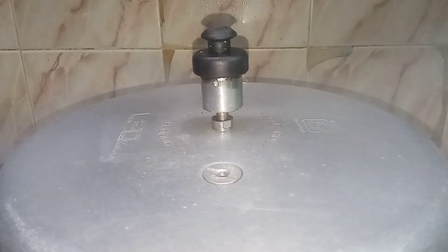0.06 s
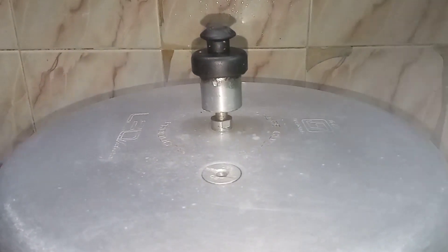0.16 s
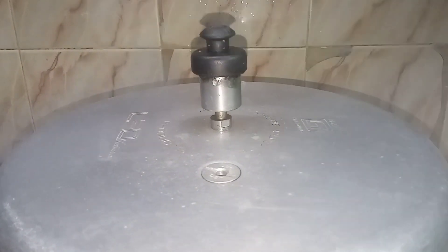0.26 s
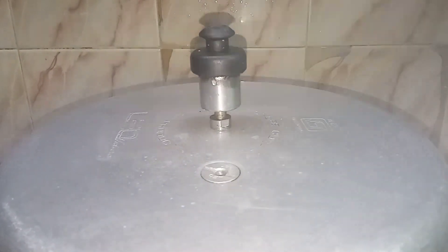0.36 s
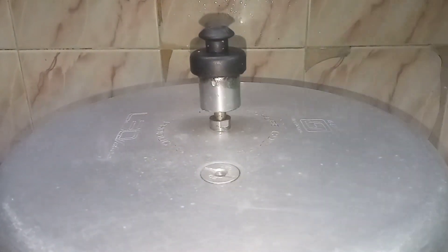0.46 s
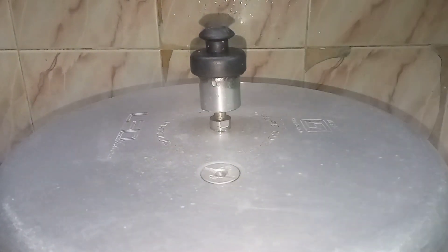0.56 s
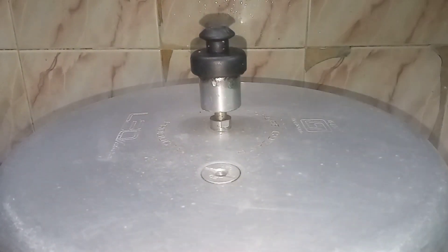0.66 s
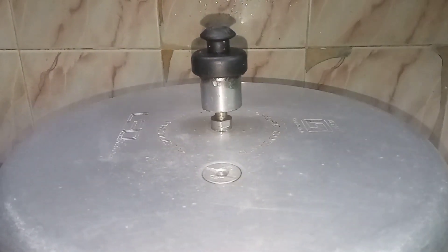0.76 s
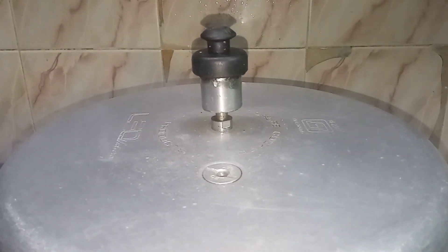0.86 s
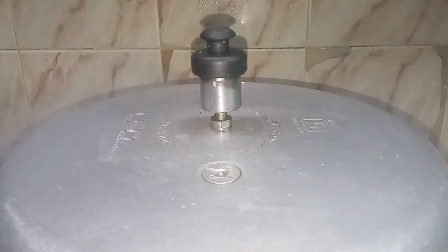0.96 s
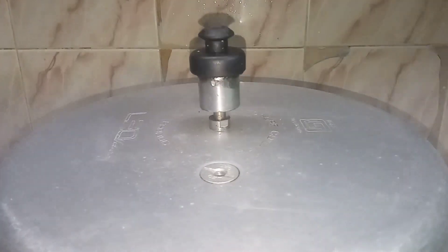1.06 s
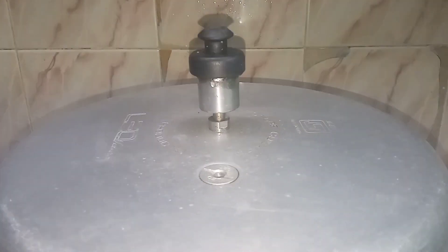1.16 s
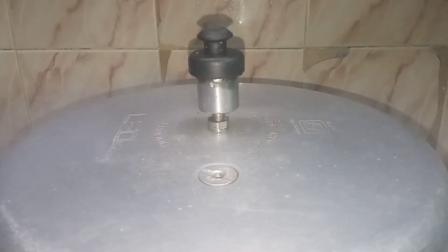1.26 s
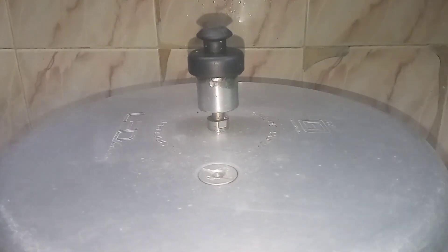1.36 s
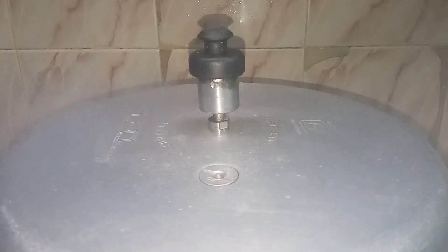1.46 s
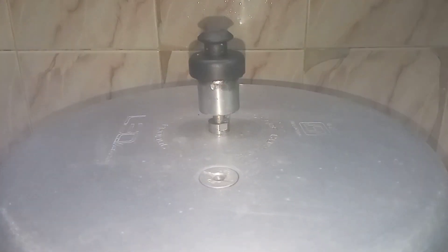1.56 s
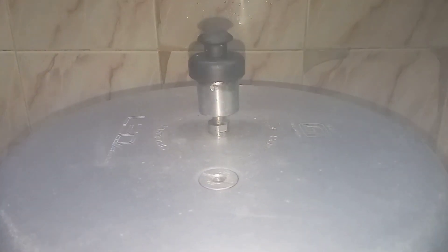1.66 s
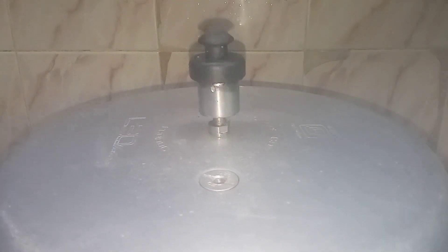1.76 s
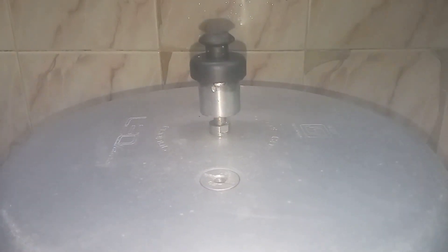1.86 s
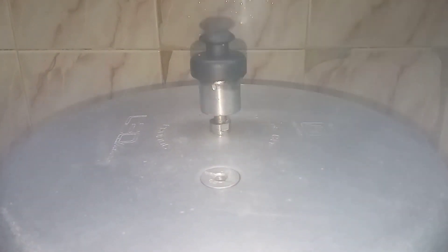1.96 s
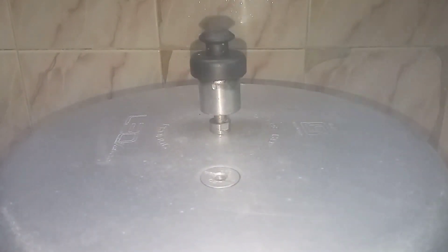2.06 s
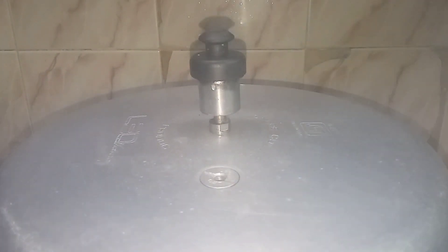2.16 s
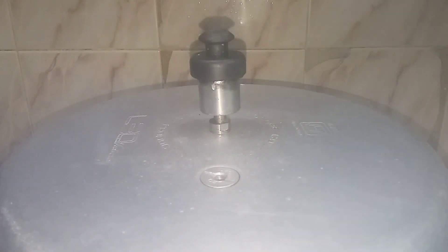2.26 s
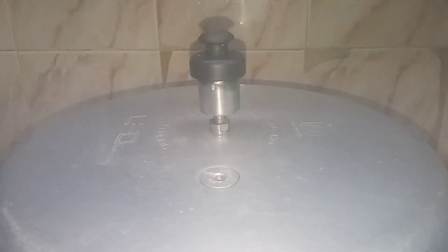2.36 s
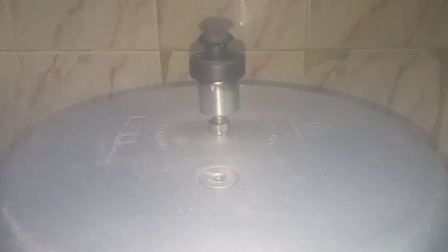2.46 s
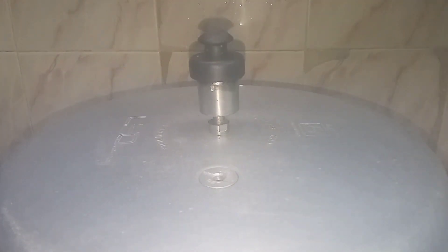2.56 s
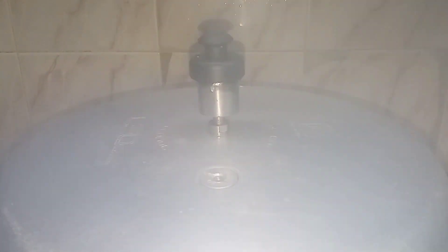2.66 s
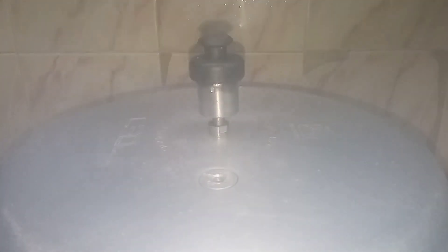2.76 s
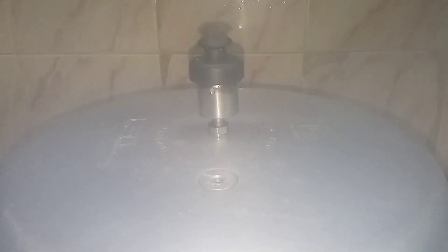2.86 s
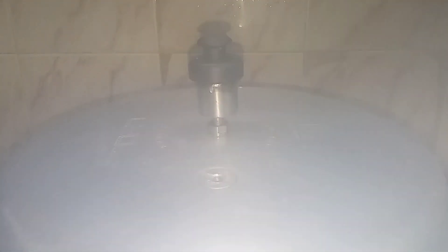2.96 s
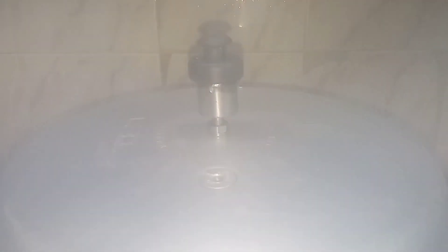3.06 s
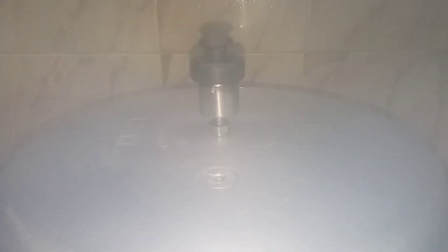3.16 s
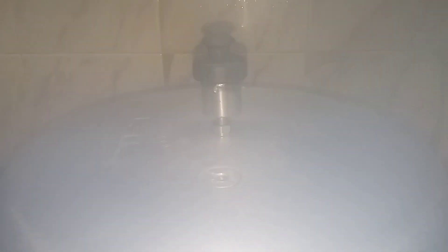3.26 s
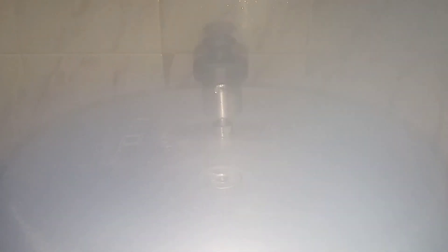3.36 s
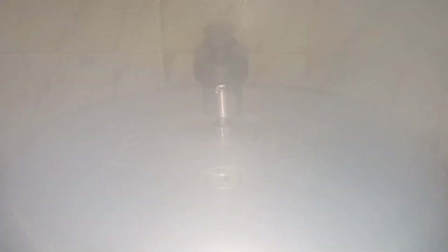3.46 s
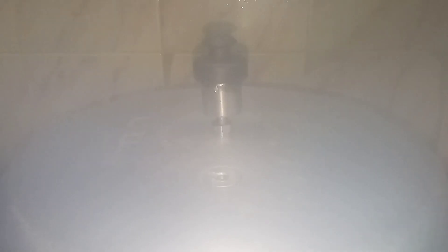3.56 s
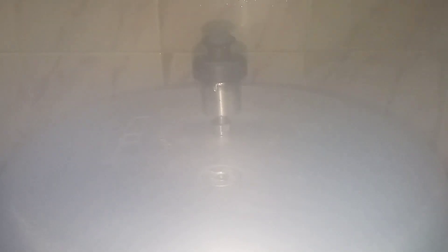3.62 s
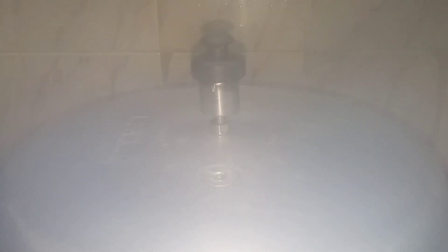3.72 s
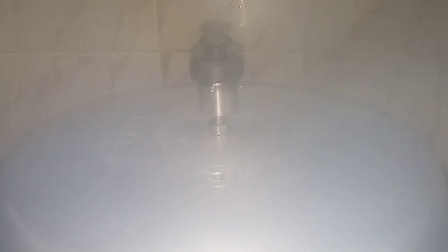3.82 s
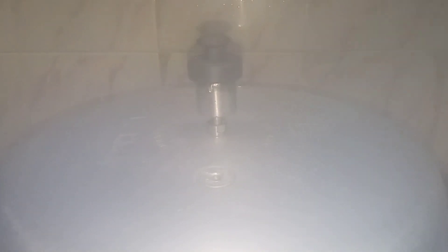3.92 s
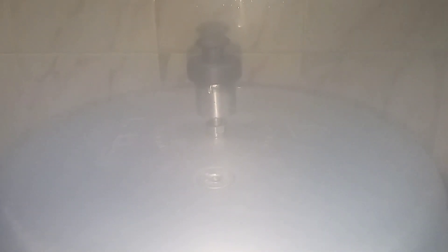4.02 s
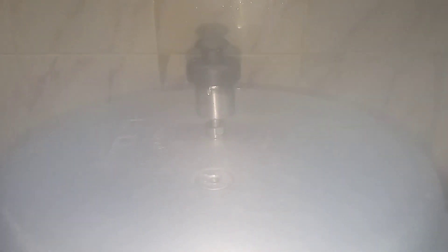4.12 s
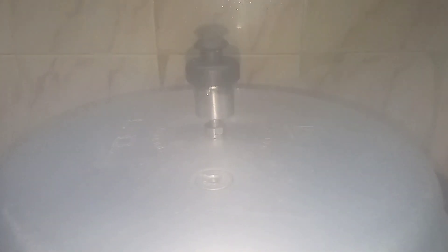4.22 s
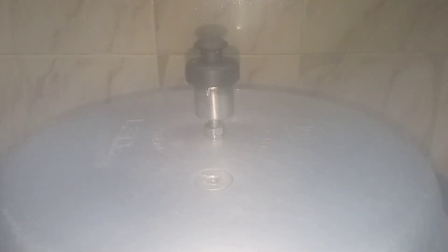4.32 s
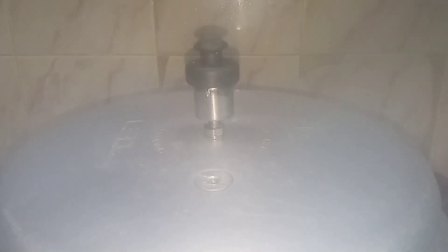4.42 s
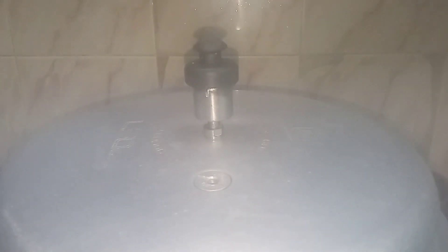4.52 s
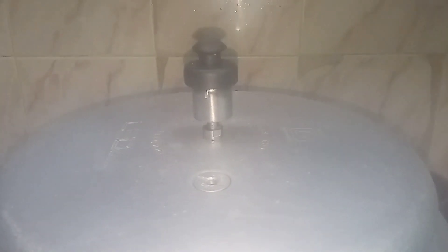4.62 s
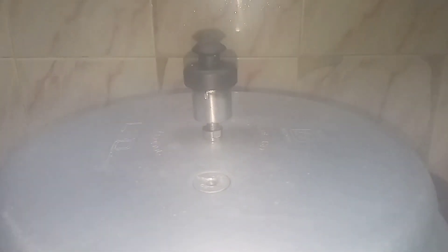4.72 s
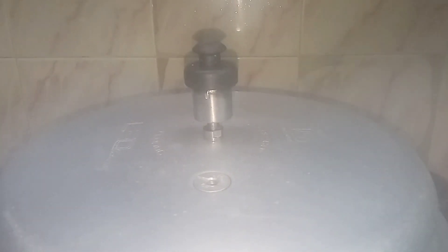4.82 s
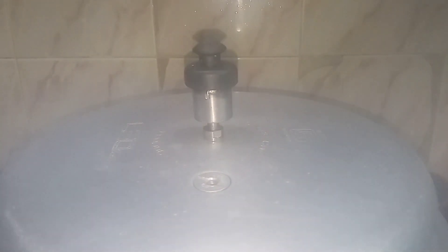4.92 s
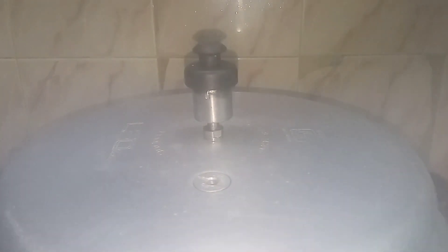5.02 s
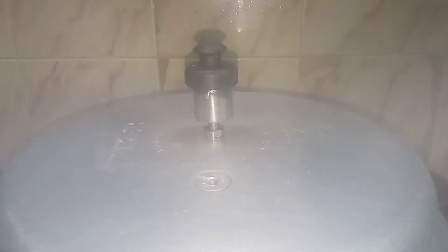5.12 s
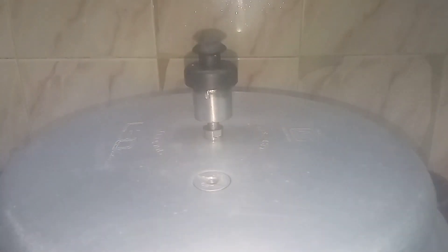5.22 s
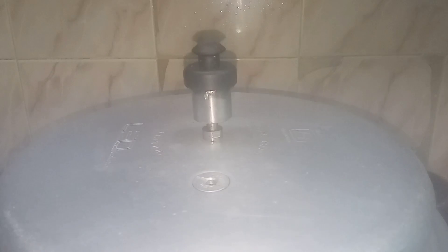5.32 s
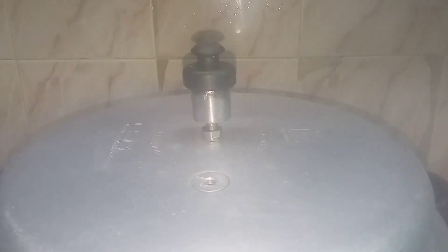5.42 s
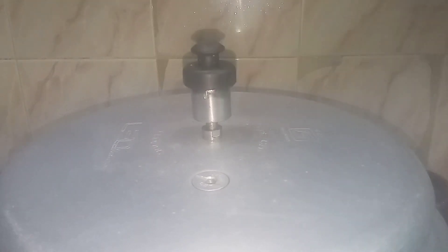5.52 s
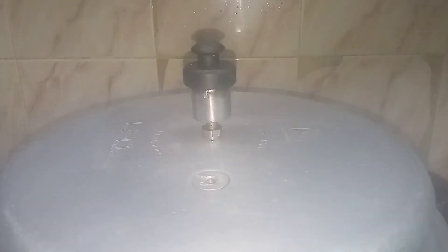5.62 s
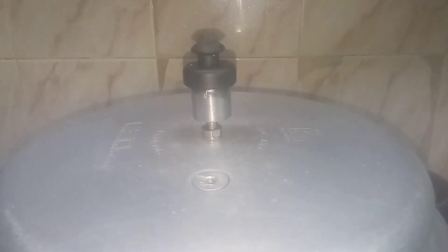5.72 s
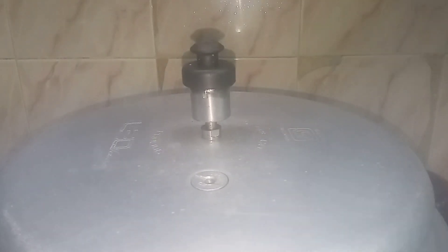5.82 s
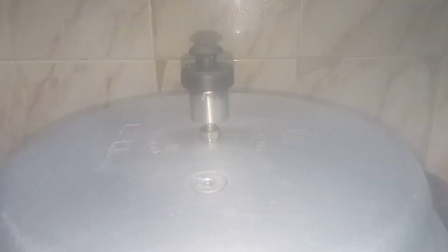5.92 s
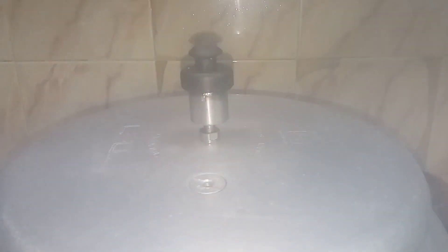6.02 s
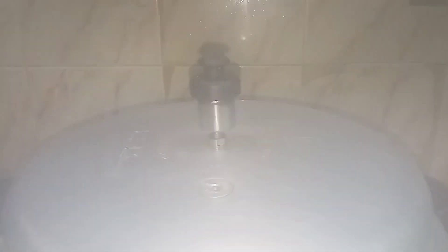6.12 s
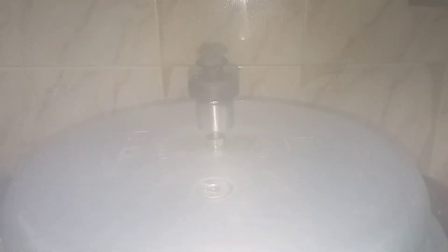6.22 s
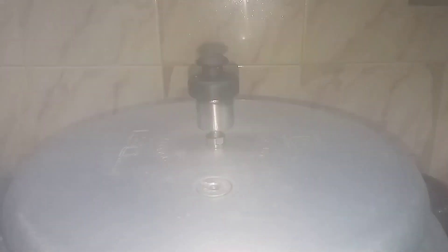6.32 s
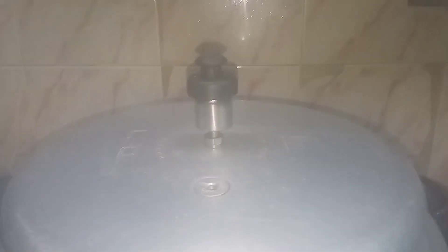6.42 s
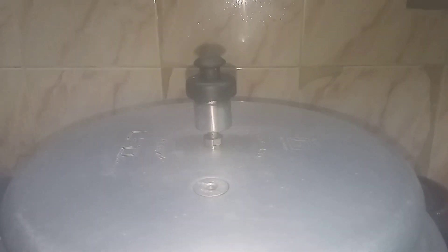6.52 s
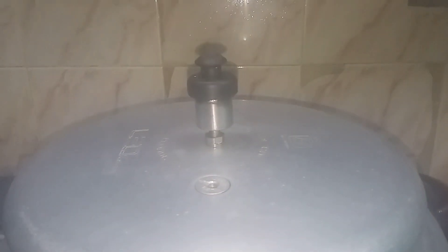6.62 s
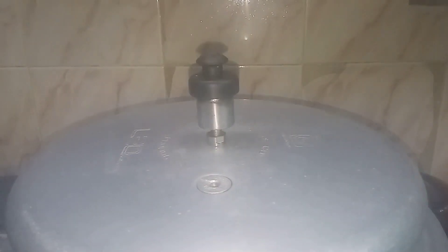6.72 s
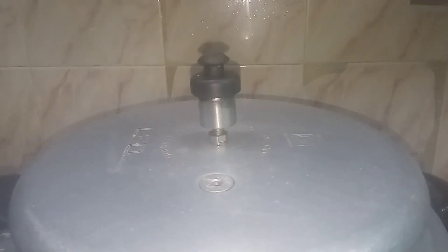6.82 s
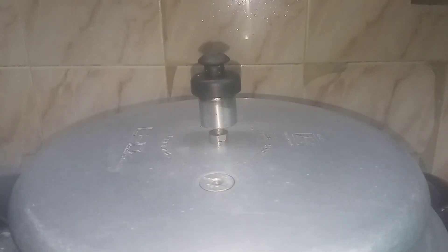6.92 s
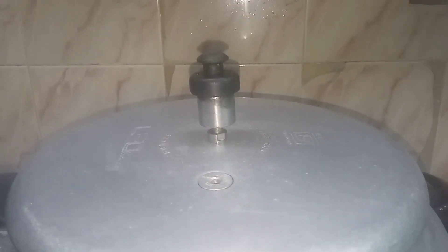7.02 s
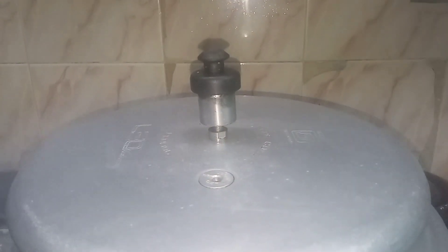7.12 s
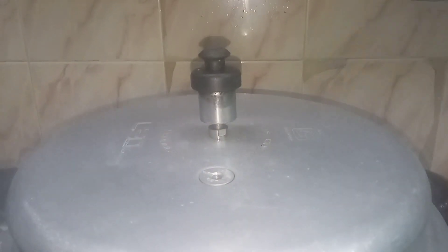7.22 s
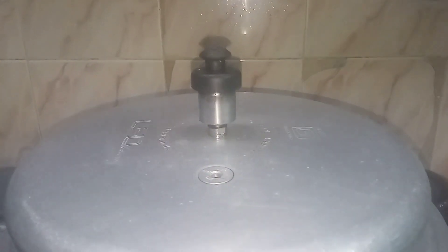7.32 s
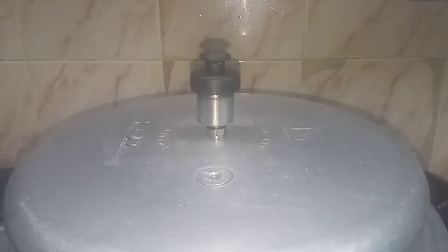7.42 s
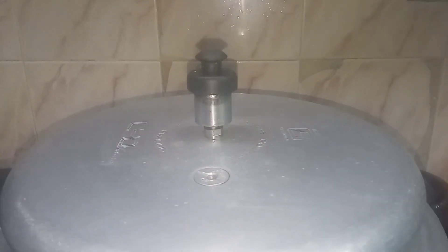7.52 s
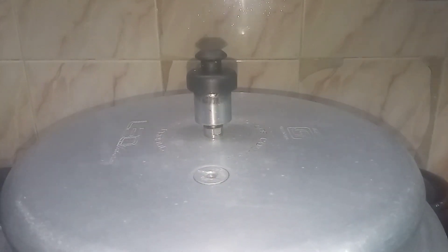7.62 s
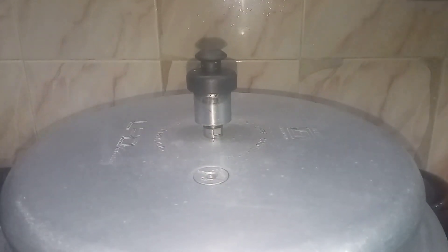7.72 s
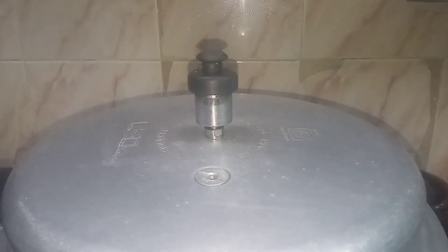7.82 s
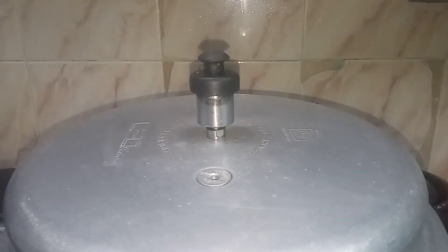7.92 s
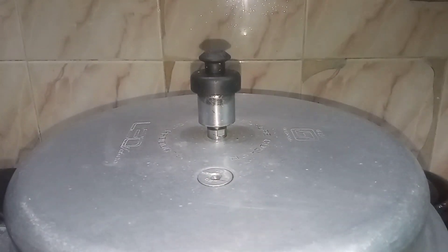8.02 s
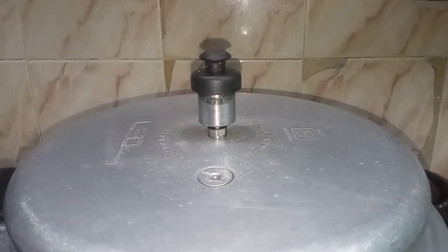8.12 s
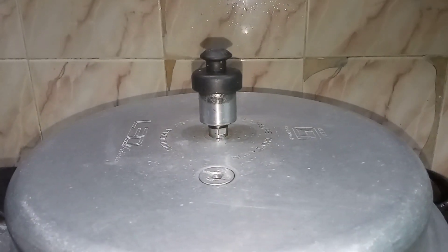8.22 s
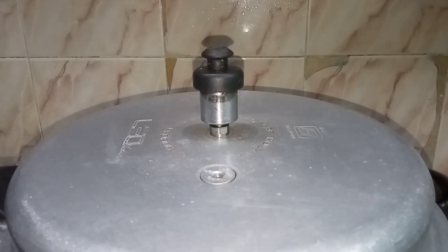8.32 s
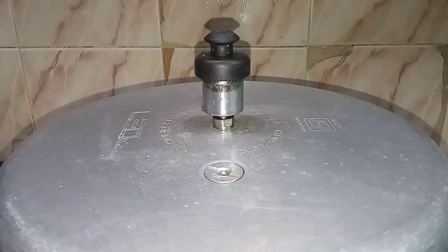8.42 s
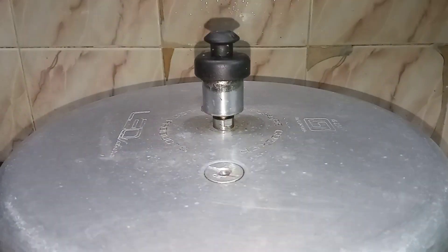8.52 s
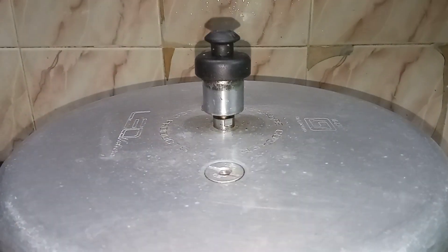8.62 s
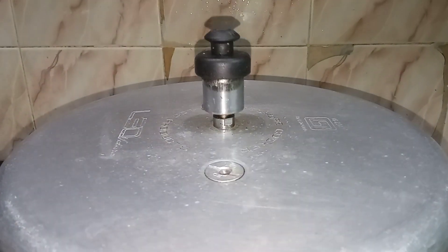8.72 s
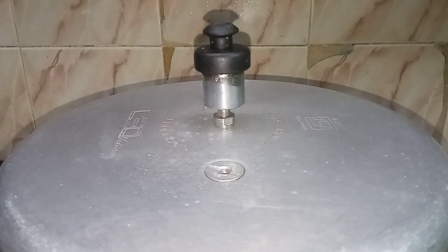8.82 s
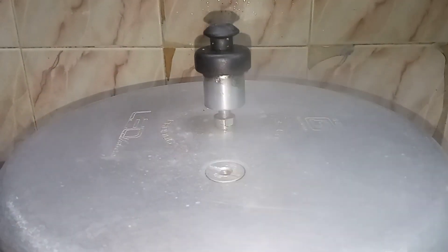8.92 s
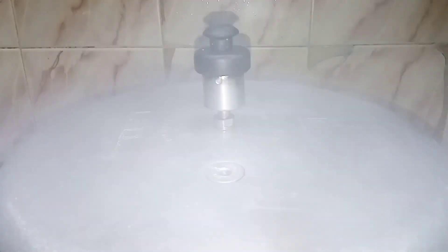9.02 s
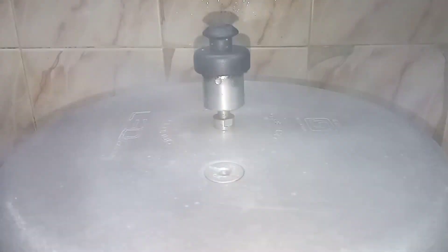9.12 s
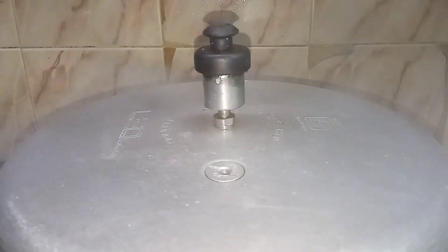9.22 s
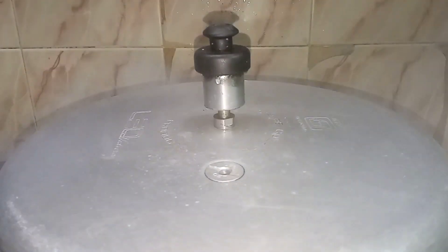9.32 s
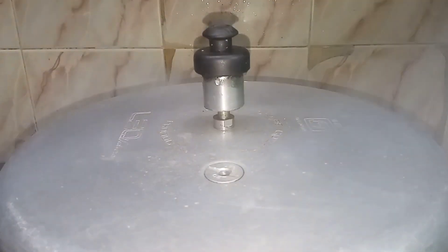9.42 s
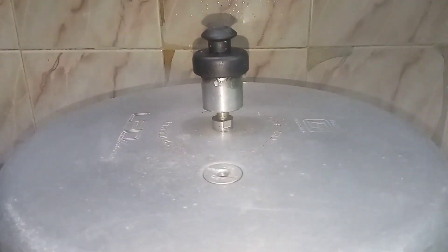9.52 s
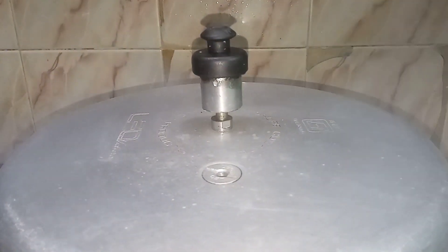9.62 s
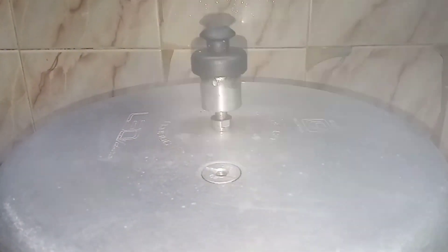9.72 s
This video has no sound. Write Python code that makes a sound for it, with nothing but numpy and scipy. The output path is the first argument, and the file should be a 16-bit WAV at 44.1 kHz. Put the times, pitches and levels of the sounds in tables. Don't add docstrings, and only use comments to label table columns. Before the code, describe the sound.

Loud continuous steam hiss from a pressure cooker weight, dense and slightly fluttering, dominates for over seven seconds. A low, blustery rumble joins it for about a second, then several quick metal knocks on the lid stop the jet. Roughly a second of quiet burner and thin leak follows, with tiny squeaks and an abrupt cut and fade-in, before a light knock releases the hiss again. Close handheld microphone, hard tiled kitchen.

```python
import sys
import numpy as np
from scipy import signal
from scipy.fft import rfft, irfft, next_fast_len
from scipy.io import wavfile
from scipy.ndimage import uniform_filter1d

SR = 44100
rng = np.random.default_rng(int(sys.argv[2]) if len(sys.argv) > 2 else 0)


def generate_wav(sig):
    pcm = np.round(np.clip(np.atleast_2d(sig).T, -1, 1) * 32767).astype(np.int16)
    wavfile.write(sys.argv[1], SR, pcm)


def volts_from_decibels(level):
    exponent = np.asarray(level, float) / 20
    return 10 ** exponent


N = 430857

# frequency in Hz, level in dB per Hz.
BURNER_COLOUR = [(24, -62), (70, -30), (160, -9), (231, -18.5), (327, -6), (490, -14.5), (605, -16.5),
                 (667, -15), (3700, -27.5), (5200, -69), (8800, -120)]
BURNER_DB = -53
# frequency in Hz, level in dB per Hz.
LEAK_COLOUR = [(2350, -36), (4000, -6), (5040, -22), (5780, -9), (6110, -9), (6730, -15), (7320, -21),
               (8290, -31), (9710, -16.5), (11600, -15.5), (13100, -19), (13600, -15), (14400, 0),
               (15400, 0)]
LEAK_DB = -27.5
# frequency in Hz, level in dB per Hz.
BOIL_COLOUR = [(120, -52), (200, -24.5), (264, -5.5), (296, -1), (317, -6.5), (600, -6.5), (780, -41),
               (1320, -120)]
BOIL_DB, BOIL_SWING_DB, BOIL_SWING_HZ = -65, 5.5, 6
HUM_START_S, HUM_EARLY_DB = 1.58, -9
# frequency in Hz, level in dB per Hz.
HANDLING_COLOUR = [(15, -43), (25, -13), (27, -20), (65, -22), (157, 6), (200, 1), (260, -41), (440, -120)]
HAND_DB, HAND_SWING_DB, HAND_SWING_HZ = -78.5, 6, 9
# start in seconds, length in seconds, level in dB.
NUDGES = [
    (3.02, 0.093, -64),
    (4.2, .3, -64),
    (6.3, 0.28, -69),
    (7.53, .14, -52),
    (8.92, .06, -64),
    (9.15, .08, -66),
]
# time in seconds, level in dB.
GUST_FORCE = [(6.575, -56), (6.595, -41), (7.1, -38.5), (7.27, -43), (7.3, -47.5), (7.55, -50.5)]
# frequency in Hz, level in dB per Hz.
GUST_COLOUR = [(15, -48), (25, -27), (68, -3.5), (96, 0.5), (230, -5), (361, -13), (395, -14), (687, -25),
               (900, -34), (1170, -50), (1980, -120)]
# start in seconds, length in seconds, extra level in dB.
PUFFS = [
    (6.68, 0.054, 3),
    (6.99, .11, 5.5),
    (7.17, .05, 6),
    (7.23, .03, 4),
]

# start in seconds, length in seconds, centre in Hz, # width
# in Hz, level in dB.
VENT_BURSTS = [
    (8.355, .045, 7750, 120, -83),
    (8.38, .09, 6950, 200, -75),
    (8.36, .1, 6050, 250, -76),
               (7.565, .19, 3450, 1200, -47), (7.57, .14, 2200, 700, -53), (9.13, .09, 1000, 900, -45),
           (9.13, .05, 145, 35, -63), (8.17, .3, 487, 10, -66), (7.97, .12, 327, 20, -66),
           (8.43, .045, 110, 90, -62), (1.205, .04, 550, 500, -53), (1.25, .06, 340, 60, -62)]

# time in seconds, peak in dB, clack frequency in Hz,
# clack T60 in seconds, lid ring in dB relative to the clack.
BLOWS = [
    (7.527, -33, 700, .025, -19),
    (7.543, -15.5, 1190, 0.017, -16),
    (7.572, -19, 1032, 0.023, -13),
    (7.578, -20.5, 1270, .025, -14),
    (7.591, -23, 583, 0.041, -11.5),
    (7.611, -28.5, 544, .022, -12),
    (7.629, -33, 577, .035, -11),
    (8.442, -32, 320, 0.015, -33),
    (8.944, -34, 650, .018, -31),
    (8.949, -26.5, 1094, .032, -28),
]
# frequency in Hz, level in dB, T60 in seconds.
LID_MODES = [(378, -10.5, 0.13), (466, -9, 0.12), (565.5, -0.5, 0.25), (632, -5.5, .1), (787, -6, 0.079),
             (927, -2.5, 0.052), (1085, -2.5, 0.11), (1270, -3, 0.074), (1416, -4, 0.073),
             (1635, -6.5, 0.13), (1914, -6, 0.1)]
# frequency in Hz, level in dB, T60 in seconds.
WEIGHT_MODES = [(2890, -3, 0.018), (3250, -1, .025), (3540, 0, 0.027), (3900, -4, 0.023),
                (4350, -11, 0.018)]
WEIGHT_DB = 8.5

# frequency in Hz, level in dB per Hz.
JET_COLOUR = [(210, -45.5), (350, -28), (636, -27.5), (920, -15.5), (1300, -15.5), (1830, -12.5),
              (2150, -7), (2540, -7), (2850, -2), (3080, -3), (4560, -8), (6430, -1), (7300, -8.5),
              (9490, -38), (16100, -120)]
# frequency in Hz, level in dB per Hz.
JET_TREBLE = [(7300, -11), (8100, -18), (8900, -16.5), (9600, -10.5), (10400, -14), (10800, -10),
              (11300, -14), (11950, -14), (12200, -18), (12800, -15), (13400, -17), (14000, -13),
              (14600, -1), (15100, .5)]
# resonance in Hz, width in Hz, level in dB.
CAVITIES = [(2710, 57, -9), (3360, 28, 2), (3856, 200, -1), (5760, 110, 3), (6400, 280, 1.5),
            (6630, 73, 2.5)]
CROSSOVERS_HZ = [1700, 2300, 7300, 7800, 13500, 13900, 15500, 15520]
# time in seconds, jet level in dB.
FLOW = [(0.0, -28.5), (0.4, -29), (1.19, -28), (1.23, -29), (3.38, -28.5), (4.03, -29.5), (4.11, -28),
        (4.19, -30.5), (4.3, -27.5), (4.76, -30), (4.82, -28.5), (6.04, -28), (6.77, -28), (7.32, -32.5),
        (7.51, -30), (7.53, -32.5)]
STEADY_DB = -30
# level in dB relative to the body, share of flow changes,
# share of valve loss, extra fall after shutting in dB per second, drop at shutting in dB.
LOW_LAYER = (-16.5, 1.25, -0.3, -40, 1)
UPPER_LAYER = (-6.5, 0.54, 1.15, -12, -3.5)
TOP_LAYER = (0, 0, 1.02, 150, -2.5)
SHUT_S, FALL_DB_PER_S = 7.53, 157
ECHO_DB, ECHO_DB_PER_S = -9, 78.5
CREEP_S, CREEP_DB, CREEP_DB_PER_S = 8.6, -24, 7
LIFT_S, LIFT_DB_PER_S = 8.93, 330

# time in seconds, gain in dB.
FADE = [(8.476, 0), (8.4763, -41), (8.487, -48), (8.495, -26), (8.56, -19), (8.59, -7), (8.62, 1.5)]
CUT_S, FADED_IN_S = FADE[0][0], FADE[-1][0]


def evened(x):
    return x / np.sqrt(np.mean(x ** 2) + 1e-20)


def read(points, hz):
    f, value = np.transpose(points)
    return np.interp(np.log(hz + 1), np.log(f + 1), value)


def patches(frames, bins_wide, frames_long, size):
    field = rng.standard_normal((frames, size)).T
    field = uniform_filter1d(field, max(int(bins_wide), 1), axis=0)
    return evened(uniform_filter1d(field, max(int(frames_long), 1), axis=1))


def noise(gain, size):
    z = rng.standard_normal(gain.shape[::-1] + (2,)) @ [1, 1j]
    return signal.istft(z.T * gain, nperseg=size, noverlap=size - size // 4)[1][:N]


def wash(colour, patchy_db, bins_wide, frames_long):
    size = 1024
    frames, hz = N // (size // 4) + 5, np.fft.rfftfreq(size, 1 / SR)
    field_db = read(colour, hz)[:, None] + patchy_db * patches(frames, bins_wide, frames_long, size=len(hz))
    return evened(noise(volts_from_decibels(field_db), size=size))


def ringing(x, hz, width):
    r = np.exp(-np.pi * width / SR)
    return 2 * signal.lfilter([1 - r], [1, -r * np.exp(2j * np.pi * hz / SR)], x).real


def flicker(hz):
    return evened(signal.lfilter(*signal.butter(2, hz, fs=SR), rng.standard_normal(N)))


def add(mix, s, sound):
    part = mix[round(s * SR):][:len(sound)]
    part += sound[:len(part)]


def burner_and_leak():
    colour = BURNER_COLOUR[:-2] + [(hz, db + LEAK_DB) for hz, db in LEAK_COLOUR[2:]]
    return volts_from_decibels(BURNER_DB) * wash(colour, patchy_db=1.0, bins_wide=14, frames_long=10)


def boiling():
    t = np.arange(N) / SR
    boil_db = BOIL_DB + BOIL_SWING_DB * np.tanh(flicker(BOIL_SWING_HZ))
    rumble = volts_from_decibels(boil_db) * wash(BOIL_COLOUR, patchy_db=3.2, bins_wide=5, frames_long=26)
    hum = evened(ringing(rng.standard_normal(N), hz=269, width=34.5))
    return rumble + volts_from_decibels(boil_db - 4.0 + HUM_EARLY_DB * (t < HUM_START_S)) * hum


def handling():
    grip = volts_from_decibels(HAND_DB + HAND_SWING_DB * np.minimum(flicker(HAND_SWING_HZ), 1))
    for s, length, db in NUDGES:
        add(grip, s, volts_from_decibels(db) * np.hanning(int(length * SR)))
    return grip * wash(HANDLING_COLOUR, patchy_db=1.0, bins_wide=4, frames_long=10)


def kitchen():
    pause = np.interp(np.arange(N) / SR, [7.5, 7.7, 8.85, 8.95], [0, 1, 1, 0])
    return pause * burner_and_leak() + (1 - pause) * (boiling() + handling())


def gust():
    t = np.arange(N) / SR
    blowing = np.interp(t, [6.55, 6.56, 7.5, 7.53], [0, 1, 1, 0])
    force_db = np.interp(t, *np.transpose(GUST_FORCE))
    for s, length, db in PUFFS:
        add(force_db, s, db * np.hanning(int(length * SR)))
    lumps = volts_from_decibels(force_db + 4.3 * np.tanh(flicker(hz=35.6)) - 1.5)
    return blowing * lumps * wash(GUST_COLOUR, patchy_db=2.0, bins_wide=7.2, frames_long=5.3)


def vent():
    out = np.zeros(N)
    for s, length, hz, width, db in VENT_BURSTS:
        air = rng.standard_normal(SR // 2)[:int(length * SR)]
        puff = evened(ringing(ringing(air, hz, width), hz, width))
        decay = volts_from_decibels(-16.0 * np.linspace(-.5, .5, len(air)))
        add(out, s, volts_from_decibels(db) * puff * signal.windows.tukey(len(air), .5) * decay)
    return out


def modes(table, spread_db, t):
    return sum(volts_from_decibels(db + extra_db - 60 * t / t60) * np.sin(2 * np.pi * hz * t)
               for (hz, db, t60), extra_db in zip(table, spread_db))


def weight():
    out, t = np.zeros(N), np.arange(SR // 2) / SR
    spreads = rng.standard_normal((len(BLOWS), len(LID_MODES)))
    for (s, db, hz, t60, ring_db), spread in zip(BLOWS, spreads):
        clack = modes([(hz, 0, max(t60, .005))], [0], t)
        lid = volts_from_decibels(ring_db) * modes(LID_MODES, 3.6 * spread, t)
        tick = volts_from_decibels(ring_db + WEIGHT_DB) * modes(WEIGHT_MODES, 2.0 * spread, t)
        onset = 1 - np.exp(-t / 0.001)
        add(out, s, volts_from_decibels(db) * (clack + lid + tick) * onset)
    tail = rng.standard_normal(len(t)) * volts_from_decibels(-60 * t / 0.46) * (t > .006)
    return out + volts_from_decibels(-5.5) * signal.oaconvolve(out, tail / np.linalg.norm(tail))[:N]


def valve(t):
    first = t <= CUT_S
    flow_db = (np.interp(t, *np.transpose(FLOW)) - STEADY_DB) * first
    since = np.maximum(t - SHUT_S, 0) * first
    direct = volts_from_decibels(-FALL_DB_PER_S * since)
    echo = volts_from_decibels(ECHO_DB - ECHO_DB_PER_S * since)
    shut_db = np.minimum(10 * np.log10(direct ** 2 + echo ** 2), 0)
    creep = volts_from_decibels(CREEP_DB + CREEP_DB_PER_S * (t - CREEP_S))
    lift = 1 / np.sqrt(1 + volts_from_decibels(LIFT_DB_PER_S * (LIFT_S - np.maximum(t, CREEP_S))) ** 2)
    lift_db = np.minimum(20 * np.log10(creep + lift), 0)
    return flow_db, np.where(first, shut_db, lift_db), since


def jet_noise():
    size = 4096
    frames, hz = N // (size // 4) + 5, np.fft.rfftfreq(size, 1 / SR)
    power = volts_from_decibels(read(JET_COLOUR[:-2] + JET_TREBLE, hz) - 2.5) ** 2
    for f, width, db in CAVITIES:
        power = power + volts_from_decibels(db - 6.0) ** 2 / (1 + (2 * (hz - f) / width) ** 2) ** 2
    depth_db = read([(600, 0.99), (2500, 2.33), (8500, 1.93), (10500, 0.82), (13000, .6)], hz)[:, None]
    comb_db = depth_db * patches(frames, 2.5, 220, size=len(hz))
    comb_db = comb_db + 0.45 * patches(frames, 40, 4, size=len(hz))
    return noise(np.sqrt(power)[:, None] * volts_from_decibels(comb_db), size=size)


def jet():
    spectrum = rfft(jet_noise(), next_fast_len(N))
    hz = np.linspace(0, SR / 2, len(spectrum))

    def band(share):
        return evened(irfft(spectrum * np.interp(hz, CROSSOVERS_HZ, share))[:N])

    t = np.arange(N) / SR
    t[(t > CUT_S) & (t < FADED_IN_S)] = FADED_IN_S
    flow_db, valve_db, since = valve(t)

    def layer_db(layer):
        db, flow, shut, fall, drop = layer
        return db + (flow - 1) * flow_db + (shut - 1) * valve_db - fall * since + drop * (since > 0)

    low = volts_from_decibels(np.minimum(layer_db(LOW_LAYER), -13.0)) * band([1, 0, 0, 0, 0, 0, 0, 0])
    body = band([0, 1, 1, 0, 0, 0, 0, 0])
    upper = volts_from_decibels(layer_db(UPPER_LAYER) + 0.15 * flicker(hz=60)) * band([0, 0, 0, 1, 1, 0, 0, 0])
    whistle_db = layer_db(TOP_LAYER) + .8 * flicker(hz=300) + .6 * flicker(hz=12)
    whistle = volts_from_decibels(whistle_db) * band([0, 0, 0, 0, 0, 1, 1, 0])
    jet_db = STEADY_DB + flow_db + valve_db + .5 * flicker(hz=40) + 0.49 * flicker(hz=4.6)
    lifted = np.interp(t, [7.78, 7.95, 8.6, 8.61], [1, 0, 0, 1])
    return lifted * volts_from_decibels(jet_db) * (low + body + upper + whistle)


def scene():
    return np.tile(kitchen() + gust() + vent() + weight() + jet(), (2, 1))


def top_cut(x):
    return signal.sosfilt(signal.butter(12, 16870, fs=SR, output="sos"), x)


def record(dry):
    thin = signal.sosfilt(signal.butter(3, 65, "high", fs=SR, output="sos"), dry)
    edge = signal.firwin(2047, 15500, window=("kaiser", 10), fs=SR)
    edged = signal.oaconvolve(thin, edge[None], "same")
    offset = -.0001
    fade_db = np.interp(np.arange(N) / SR, *np.transpose(FADE))
    return top_cut((edged + offset) * volts_from_decibels(fade_db))


dry = scene()
out = record(dry)
generate_wav(out)
```